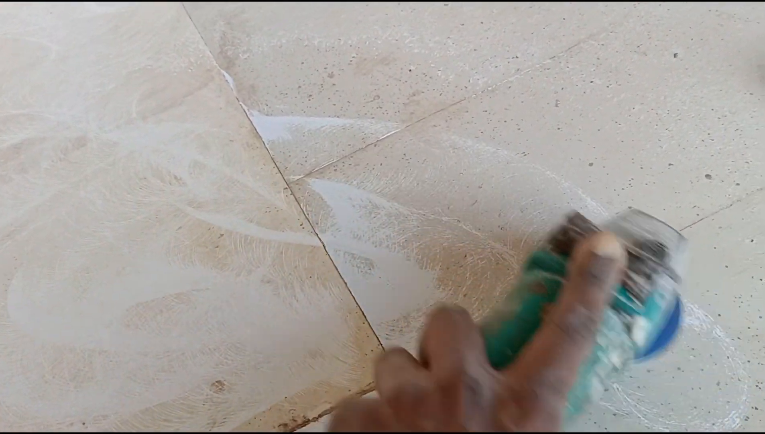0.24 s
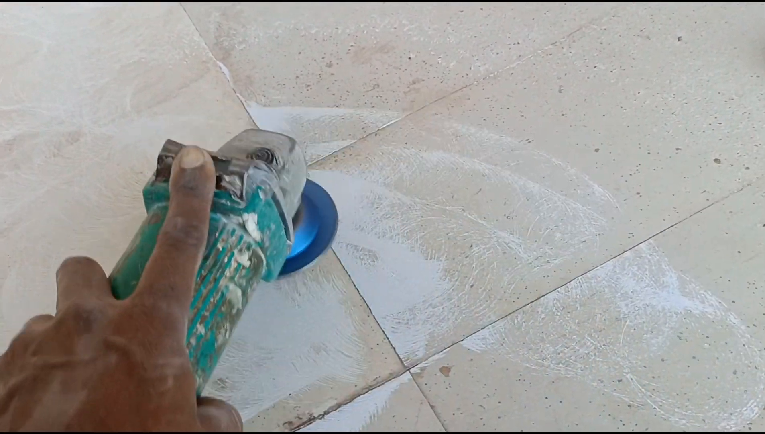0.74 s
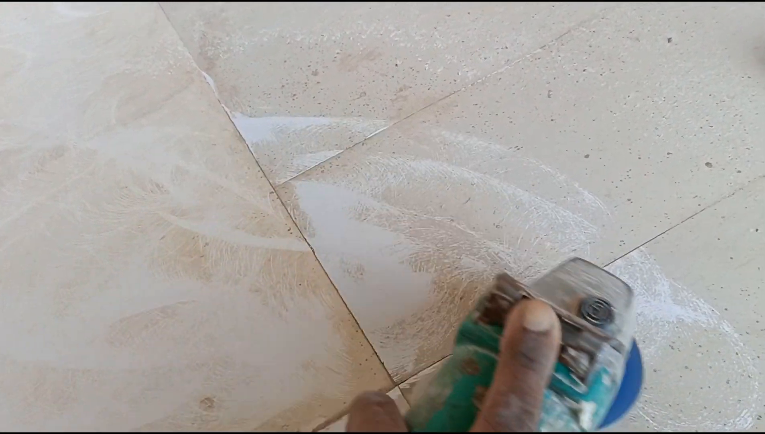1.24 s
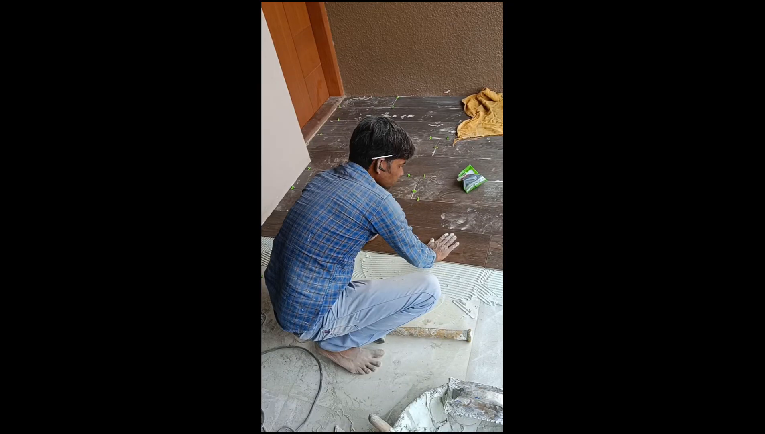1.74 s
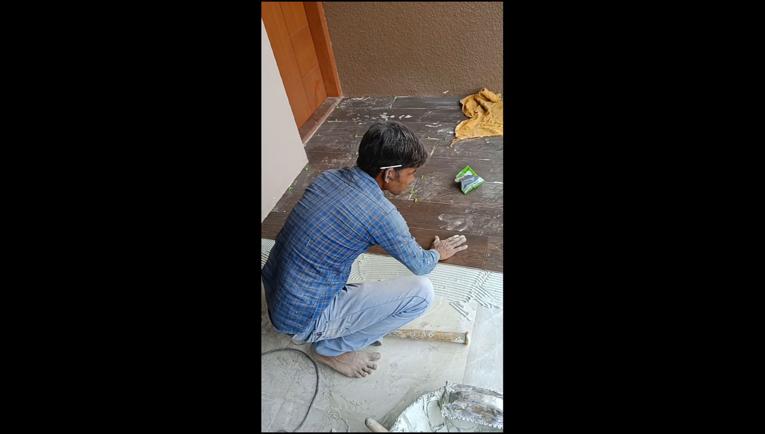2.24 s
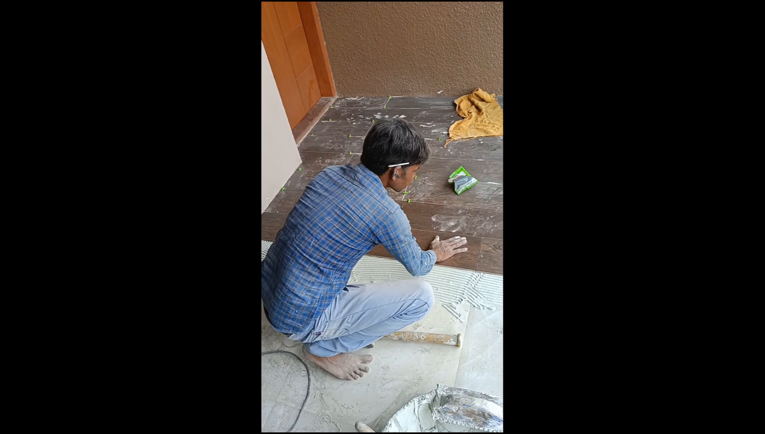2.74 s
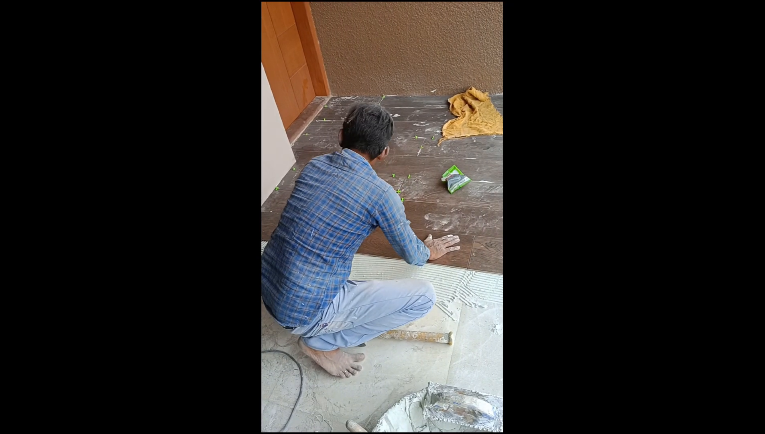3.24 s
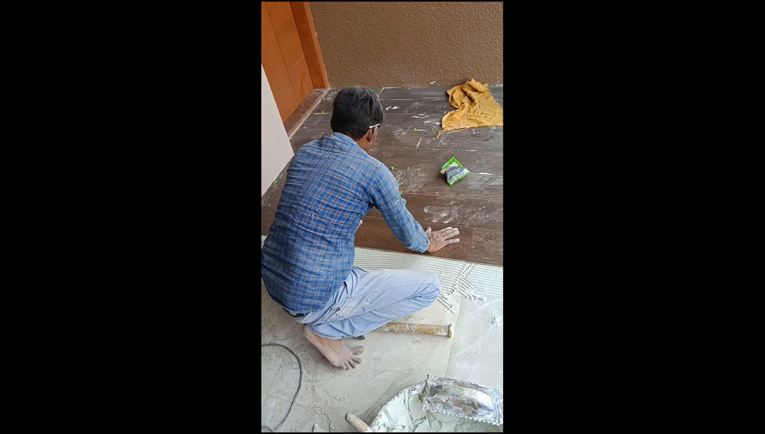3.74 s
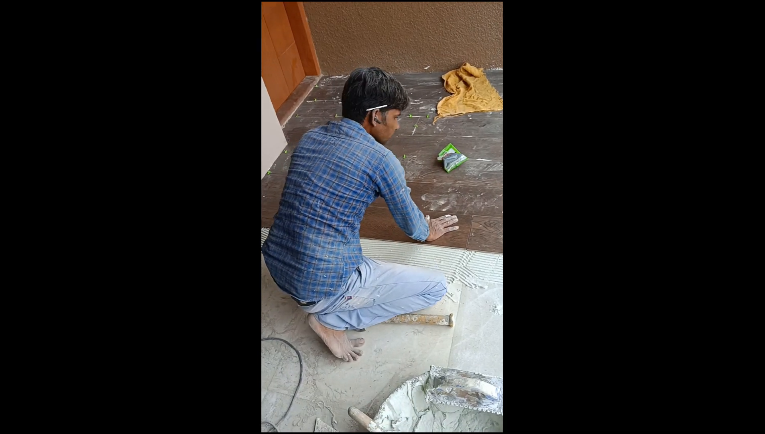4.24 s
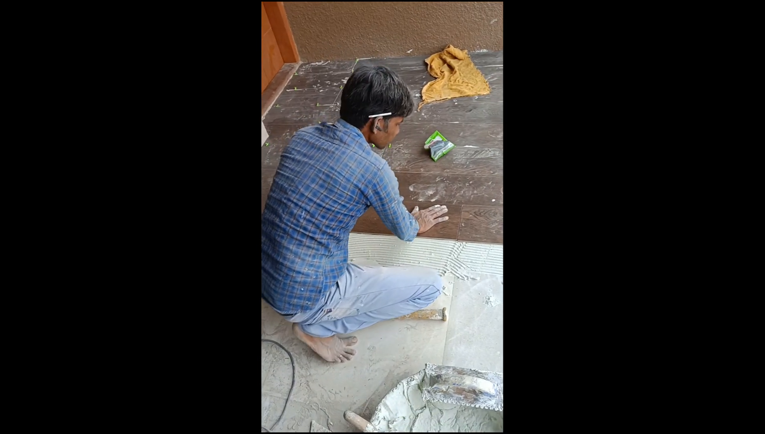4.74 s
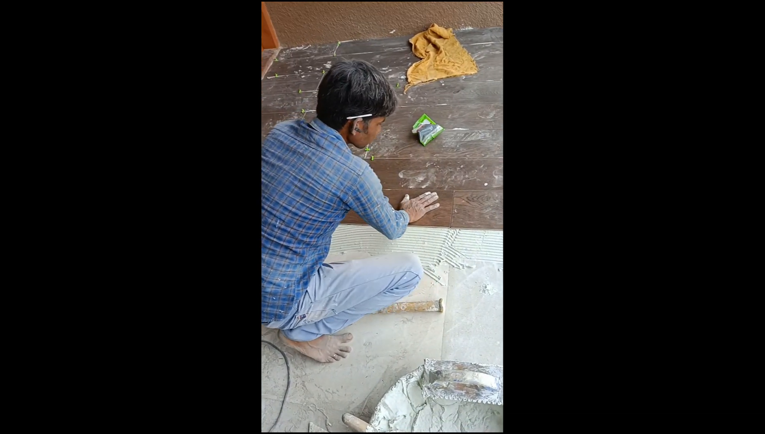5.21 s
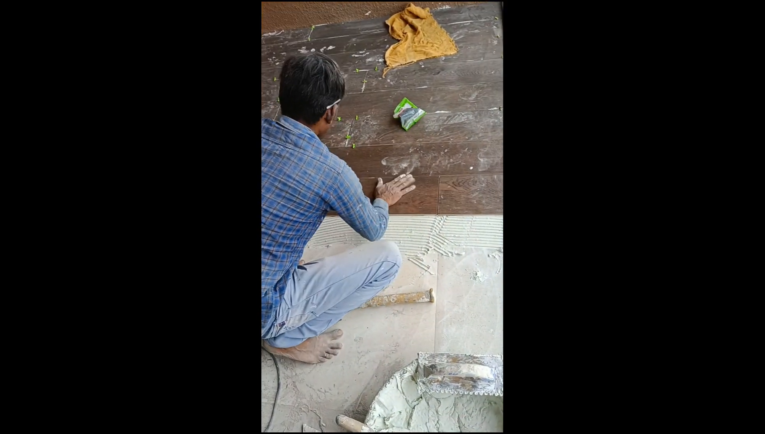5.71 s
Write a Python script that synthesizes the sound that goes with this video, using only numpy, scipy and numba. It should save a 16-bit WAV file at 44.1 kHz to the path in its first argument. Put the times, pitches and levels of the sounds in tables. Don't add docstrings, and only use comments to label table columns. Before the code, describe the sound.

From 0 to 1.4 s an angle grinder scours glazed tile right beside a phone: a dense, harsh, gritty rasp with metallic treble ringing, and low fan wind buffeting the microphone, heavier on the right. A thin gear whine near 5.8 kHz swells around 0.6-0.9 s as the tool swings close. It stops abruptly, leaving about 0.13 s of near silence. A quiet, bare, echoing room then fades in with street air, hand rumble and a dusty palm wipe until 2 s. Hollow tile thumps boom at 2.2 and, harder, 2.6 s, with sharp ticks around 2.8 s. A small steel tool clinks at 3.1 s. Distant hammer taps recur about every 0.45 s from 3.2 to 5.5 s, among faint chirps, grit snaps and soft wipes, the longest at 4.6-4.95 s. A final heavy thump lands at 5.8 s, then a loud knock at 5.95 s.

```python
import sys
import numpy as np
from scipy import signal
from scipy.fft import rfft, irfft, next_fast_len
from scipy.io import wavfile
from scipy.ndimage import uniform_filter1d
from numba import njit

SR = 44100
rng = np.random.default_rng(int(sys.argv[2]) if len(sys.argv) > 2 else 0)


def generate_wav(sig):
    pcm = np.round(np.clip(np.atleast_2d(sig).T, -1, 1) * 32767).astype(np.int16)
    wavfile.write(sys.argv[1], SR, pcm)


def how_loud(loudness_db):
    steps = np.asarray(loudness_db, float) / 20
    return 10 ** steps


N = 263277


def hertz(x):
    return np.maximum(np.fft.rfftfreq(x.shape[-1], 1 / SR), 1)


def read(table, hz):
    table_hz, value = np.transpose(table)
    return np.interp(np.log(hz), np.log(table_hz), value)


def colour(x, table):
    y = irfft(rfft(x) * how_loud(read(table, hertz(x))), x.shape[-1])
    return y / np.sqrt(np.mean(y ** 2, axis=-1, keepdims=True))


def walk(rate, n):
    hold = int(SR / rate) + 1
    steps = np.repeat(rng.standard_normal(n // hold + 1), hold)
    return 0.76 * uniform_filter1d(uniform_filter1d(steps, hold), hold)[:n]


def pair(n, like_hz):
    mid, side = rfft(rng.standard_normal((2, n)))
    like = 1 / (1 + (hertz(np.empty(n)) / like_hz) ** 3)
    opposite = np.array([[1], [-1]])
    return irfft(np.sqrt(1 + like) * mid + np.sqrt(1 - like) * side * opposite, n) / np.sqrt(2)


def octaves(x, gain):
    spectrum, place = rfft(x), 2 * np.log2(hertz(x) / 22)
    total = 0
    for k in range(20):
        band = irfft(spectrum * np.clip(1 - abs(place - k), 0, 1), x.shape[-1])
        total = total + gain(22 * 2 ** (k / 2)) * band
    return total


def grains(n, per_s, spread_db):
    when, sign, size = rng.random((3, 2, n))
    return (when < per_s / SR) * np.sign(sign - .5) * how_loud(-spread_db * np.log(size + 1e-4))


def ring(modes, length_s):
    t = np.arange(int(length_s * SR)) / SR
    total = 0
    for (hz, db, t60), (off_pitch, off_level) in zip(modes, rng.standard_normal((len(modes), 2))):
        tone = np.sin(2 * np.pi * hz * (1 + 0.0048 * off_pitch) * t)
        total = total + how_loud(db + 2.4 * off_level) * tone * 1000 ** (-t / t60)
    return total


def add(out, start_s, x):
    i = int(start_s * SR)
    out[..., i:i + x.shape[-1]] += x[..., :N - i]


def sides(db, pan_db):
    return how_loud(db + np.array([pan_db, -pan_db]) / 2)


# pitch_hz [Hz], t60_s [s]
ROOM_T60 = [(100, 0.91), (300, 0.7), (1000, 0.37), (3000, 0.41), (8000, 0.3), (15000, 0.22)]


def echo(length_s):
    t = np.arange(next_fast_len(int(length_s * SR))) / SR
    tail = octaves(pair(len(t), 440), lambda hz: 1000 ** (-t / read(ROOM_T60, hz)))
    tail = tail * np.clip(t / 0.0051, 0, 1)
    return tail / np.sqrt(np.mean(np.sum(tail ** 2, axis=1)))


# pitch_hz [Hz], level_db [dB per Hz]
STREET_COLOUR = [(60, -31.5), (120, 0.5), (200, -1.5), (400, -7.5), (630, -10.5), (1000, -12), (2300, -18),
                 (2800, -27.5), (3300, -29), (4000, -27.5), (6300, -30.5), (7300, -38), (8000, -49),
                 (15000, -47)]
# middle_s [s], length_s [s], level_db [dB], upper_db [dB], left_minus_right_db [dB]
GRIPS = [
    (1.655, 0.045, -43, -46, -18.5),
    (1.795, .07, -43.5, -45.5, -7.5),
    (3.84, 0.35, -53, -69, 3),
    (4.225, 0.034, -55, -60, 6),
    (5.11, 0.089, -65, -61, .5),
]


def hush():
    air = how_loud(-52.5) * octaves(colour(pair(N, 480), STREET_COLOUR), lambda hz: how_loud(0.6 * walk(7.2, N)))
    t = np.arange(N) / SR
    tremor_db, tremors_per_s = 2, 6.8
    low = how_loud(-53.5 + tremor_db * walk(tremors_per_s, N))
    high = how_loud(-62.5 + tremor_db * walk(tremors_per_s, N))
    for middle_s, length_s, db, upper_db, pan_db in GRIPS:
        bump = np.exp(-((t - middle_s) / length_s) ** 2)
        low = low + sides(db, pan_db)[:, None] * bump
        high = high + sides(upper_db, pan_db)[:, None] * bump
    rumble = colour(pair(N, 60), [(15, -5.0), (27, 28.0), (50, 7.5), (70, -39.0)])
    upper = colour(pair(N, 100), [(45, -38), (62, 20.5), (98, 3.0), (125, -42.5)])
    return air + low * rumble + high * upper


# start_s [s], end_s [s], pitch_hz [Hz], level_db [dB]
NOTES = [(2.42, 2.512, 4600, -65), (2.98, 3.807, 3800, -73), (3.98, 4.14, 4340, -74),
         (3.553, 3.717, 3770, -63), (4.14, 4.206, 3700, -60), (4.27, 4.37, 3690, -63),
         (4.32, 4.386, 1470, -60), (5.152, 5.332, 3720, -72), (5.63, 5.686, 1450, -59),
         (5.67, 5.81, 3800, -74), (5.694, 5.812, 674, -42.5), (4.748, 5.3, 88, -63), (5.448, 5.8, 88, -56),
         (5.775, 5.827, 3700, -55)]


def notes():
    out = np.zeros((2, N))
    for start_s, end_s, hz, db in NOTES:
        t = np.arange(0, end_s - start_s, 1 / SR)
        ends = np.clip(np.minimum(t / 0.02, (t[-1] - t) / 0.022), 0, 1)
        level = how_loud(db - 1.5 + 0.55 * walk(41, len(t)))
        add(out, start_s, level * ends * np.sin(2 * np.pi * hz * t + 0.52 * walk(43, len(t))))
    return out


# start_s [s], level_db [dB]
HAMMER = [
    (2.018, -37),
    (3.201, -35),
    (3.637, -34.5),
    (4.081, -39),
    (4.54, -36.5),
    (4.986, -35.5),
    (5.457, -41.5),
]
# start_s [s], level_db [dB], pitch_hz [Hz], spread [share of pitch],
# room_db [dB]
TAPS = [
    (1.675, -44, 1000, 0.48, 4),
    (2.74, -20.5, 450, 0.62, 13),
    (2.815, -15, 1083, 0.3, 10.5),
    (2.832, -20, 1150, 0.53, -12),
    (3.488, -47.5, 1180, 0.52, 11),
    (3.595, -36.5, 2300, 0.25, 7.5),
    (3.617, -43.5, 2160, 0.23, 10.5),
    (5.952, -12, 706, 0.43, 5),
        (2.824, -33, 2780, 0.78, 11.5),
    (3.105, -41, 1970, 0.66, 14),
    (3.128, -37.5, 2100, 0.14, 6.3),
    (3.491, -49, 4470, 0.88, 4),
]


def taps():
    out, t = np.zeros((2, N)), np.arange(int(.02 * SR)) / SR
    hammer = [(start_s, db, 833, 0.34, 1) for start_s, db in HAMMER]
    for start_s, db, hz, spread, room_db in TAPS + hammer:
        ratio = 1.1 + abs(spread)
        band = signal.butter(3, [hz / ratio, min(hz * ratio, 7000)], "bandpass", fs=SR, output="sos")
        rough = 1 + 0.34 * rng.standard_normal(len(t))
        tick = signal.sosfilt(band, rough * np.exp(-t / .00006))
        tick *= how_loud(db - 1.0) / np.abs(tick).max()
        add(out, start_s, tick)
        add(out, start_s, how_loud(room_db) * signal.fftconvolve(tick[None], echo(0.31), axes=1))
    return out


# pitch_hz [Hz], level_db [dB], t60_s [s]
STEEL_MODES = [(2140, 7, .12), (2900, -5, .2), (4000, 2.5, 0.16), (3925, 6, .2)]


def clink():
    out, start_s = np.zeros((2, N)), 3.106
    bar = how_loud(-54) * ring(STEEL_MODES, .3)
    add(out, start_s, .4 * bar)
    add(out, start_s, signal.fftconvolve(bar[None], echo(.4), axes=1))
    return out


# start_s [s], level_db [dB]
CRACKS = [
    (3.49, -58),
    (3.96, -60.5),
    (4.089, -61),
    (4.225, -70),
]


def cracks():
    out, t = np.zeros((2, N)), np.arange(int(.06 * SR)) / SR
    for start_s, db in CRACKS:
        noise = rng.standard_normal((2, len(t)))
        snap = colour(noise, [(4000, -28), (7000, -6), (10000, 3.5), (15500, -3.5)])
        add(out, start_s, how_loud(db) * snap * 1000 ** (-t / .07))
    return out


# pitch_hz [Hz], level_db [dB per Hz]
WIPE = [(1650, -3), (2800, -11.5), (3850, -4), (5130, -7), (6010, -2), (8380, -16.5), (12200, -21.5),
        (14700, -25), (15700, -18)]
# pitch_hz [Hz], level_db [dB per Hz]
WIPE_DULL = [(500, -12), (1200, -11), (2200, -6.5), (3000, -14), (4500, -41)]


def rub(n, bright, dull):
    dust = rng.standard_normal((2, n)) + 0.83 * grains(n, 1500, 1.2)
    dust = dust * how_loud(0.84 * walk(38.0, n))
    return bright * colour(dust, [(1800, -49)] + WIPE) + dull * colour(dust, WIPE_DULL)


# start_s [s], fastest_s [s], end_s [s], level_db [dB], dull_db [dB]
STROKES = [
    (1.299, 1.763, 1.98, -43.5, -2),
    (2.075, 2.128, 2.19, -67, -10),
    (3.49, 3.486, 3.57, -51, -11),
    (3.787, 3.832, 3.88, -62.5, -1),
    (3.88, 3.924, 4.02, -61, 0),
    (4.14, 4.162, 4.25, -73, -3),
    (4.6, 4.799, 4.95, -45, -4.5),
    (4.81, 4.86, 4.96, -56, 12.5),
    (5.107, 5.138, 5.23, -60, -8),
    (5.527, 5.575, 5.62, -66.5, -5),
]


def wipes():
    out = np.zeros((2, N))
    for start_s, fastest_s, end_s, db, dull_db in STROKES:
        t = np.arange(start_s, end_s, 1 / SR)

        def arch(top_s):
            return np.sin(np.interp(t, [start_s, top_s, end_s], [0, np.pi / 2, np.pi])).clip(0)

        speed = arch(fastest_s)
        press = arch(fastest_s + 0.33 * (end_s - fastest_s))
        add(out, start_s, how_loud(db + 0.5) * rub(len(t), speed ** 1.72, how_loud(dull_db) * press ** 3.6))
    before = np.arange(-.03, 0, 1 / SR)
    for thump, db in zip(THUMPS, [-44.5, -48.5, -38]):
        swell = how_loud(db + 2501 * before)
        add(out, thump[0] + before[0], swell * rub(len(before), 1, how_loud(14)))
    return out


# pitch_hz [Hz], level_db [dB per Hz]
SNAP = [(800, -14), (2200, 3), (4000, -14.5), (6000, -6.5), (8000, -25), (15500, -30)]


def snaps():
    out, t = np.zeros((2, N)), np.arange(-.002, .002, 1 / SR)
    for start_s, db, *_ in THUMPS:
        click = colour(rng.standard_normal(len(t)), SNAP) * np.exp(-(t / 0.00061) ** 2)
        add(out, start_s + .002 + t[0], how_loud(db - 10) * click)
    return out


# start_s [s], level_db [dB], boom_db [dB], brightness [dB per octave], slab_hz [Hz]
THUMPS = [
    (2.216, -7, -13, 0, 2360),
    (2.595, -2.5, -14, -2.5, 1936),
    (5.813, -3, -12.5, 0, 2260),
]
# pitch_hz [Hz], level_db [dB], t60_s [s]
TILE = [(545, -2.5, 0.069), (642, -14.5, 0.0052), (950, 2, 0.027), (2076, -9, 0.016), (2170, -5, 0.012),
        (3920, -10.5, 0.0064)]
# pitch_hz [Hz], level_db [dB per Hz]
SLAB = [(60, -45.5), (150, -10.5), (250, -14), (380, -14), (660, -17.5), (1250, -17), (2300, -26),
        (2900, -33), (5800, -30.5), (7300, -35.5), (8000, -46), (15700, -54)]
# pitch_hz [Hz], level_db [dB], t60_s [s]
BED = [(51.4, -11.5, 0.76), (88, -14, 0.73), (147, -7, 0.56),
       (130.7, 2, 1.23), (179.5, -9.5, 0.99), (204, 2.5, 0.63), (221.4, 0.5, 0.97), (259, 13, 0.3),
        (330, -10, 0.4), (410, -10, 0.32), (447, -0.5, 0.61), (460, -19, 0.72)]


def thumps():
    out = np.zeros((2, N))
    no_bass = signal.butter(2, 250, "highpass", fs=SR, output="sos")
    next_starts = [row[0] for row in THUMPS[1:]] + [N / SR]
    for (start_s, db, boom_db, bright_db, slab_hz), next_s in zip(THUMPS, next_starts):
        push = np.hanning(int(0.00024 * SR))
        for late_s, part_db in (0, -14), (.0028, 2), (.0062, -0.5):
            knock = np.convolve(ring(TILE, 0.048), push / push.sum())
            blow = how_loud(db + part_db + 2.0) * signal.sosfilt(no_bass, knock)
            add(out, start_s + late_s, np.array([.85 * np.roll(blow, 14), 1.15 * blow]))

        tail = echo(0.97)
        t = np.arange(tail.shape[1]) / SR
        tail = tail * (1 + 1.1 * np.exp(-t / 0.0037))
        hz = hertz(tail)
        tilt_db = bright_db * np.log2(hz / 2000).clip(0)
        lift_db = 7 / (1 + (2 * (hz - slab_hz) / 890) ** 2)
        tail = irfft(rfft(tail) * how_loud(read(SLAB, hz) + tilt_db + lift_db), len(t))
        add(out, start_s, how_loud(db + 52.5) * tail * np.linspace(3, 0, len(t)).clip(0, 1))

        boom = ring(BED, next_s - start_s + 0.012)
        t = np.arange(len(boom)) / SR
        boom = boom * np.exp(-(t / .5) ** 4)
        swell = 1 - np.exp(-t / 0.059)
        stop = np.clip(np.arange(len(boom), 0, -1) / (.01 * SR), 0, 1)
        add(out, start_s, how_loud(db + boom_db + 3.55) * boom * swell * stop)
    return out


# time_s [s], gear_hz [Hz], facing [0-1]
SWING = [
    (0, 5800, 0),
    (.3, 5810, 0.43),
    (.45, 5780, 0),
    (0.601, 5838, 0.8),
    (.77, 5830, 0.88),
    (.91, 5785, 0.92),
    (.96, 5700, .4),
    (1.1, 5690, 0.35),
    (1.2, 5800, 0.23),
]
# pitch_hz [Hz], level_db [dB per Hz]
WIND = [(12, -39), (20, 2), (53, 3.5), (108, 0.5), (214, -3), (456, -8), (847, -8.5), (3070, -23.5),
        (4000, -22), (5200, -44), (8800, -120)]
# pitch_hz [Hz], level_db [dB per Hz]
GRIT = [(410, -33), (700, -18), (851, -4), (1570, -9), (2320, -6.5), (3080, -12.5), (5910, -10),
        (7470, -13.5), (9080, -27), (10100, -21), (12600, -28.5), (13900, -22.5), (15700, -22.5)]
# pitch_hz [Hz], width_hz [Hz], level_db [dB]
DISC = [(7450, 300, 2.5), (9800, 500, 4), (11400, 200, 7), (13350, 330, 9), (14350, 400, 7),
        (15150, 350, 7)]
# pitch_hz [Hz], left_minus_right_db [dB]
GRIT_PAN = [(1000, -3.5), (4000, -2), (8000, -2.5), (14000, -12)]


def grinder():
    n = next_fast_len(int(1.5 * SR))
    t = np.arange(n) / SR
    time_s, gear_hz, facing = np.transpose(SWING)
    gear_hz, facing = np.interp(t, time_s, gear_hz), np.interp(t, time_s, facing)

    scratch = rng.standard_normal((2, n)) + 0.85 * grains(n, 4000, 2.8)
    lift = 1
    for hz, width_hz, db in DISC:
        lift = lift + (how_loud(db) - 1) / (1 + (2 * (hertz(t) - hz) / width_hz) ** 2)
    grit = colour(irfft(rfft(scratch) * lift, n), GRIT)
    grit = octaves(grit, lambda hz: how_loud(0.48 * walk(5.4, n)) * sides(0, read(GRIT_PAN, hz))[:, None])

    gusts_per_s = 9.06
    wind_db = -23 + 0.75 * t + 1.84 * walk(gusts_per_s, n)
    bass_db = -2.5 + 2.5 * walk(gusts_per_s, n)
    wind_pan_db = -17 + 3 * facing
    bursts = how_loud(4.76 * np.array([walk(150, n), walk(150, n)]))
    eddies = rng.standard_normal((2, n)) * bursts + 0.67 * grains(n, 1200, 5.4)

    def gust(hz):
        db = wind_db + (hz < 140) * bass_db + .5 * walk(20.9, n)
        return sides(db, wind_pan_db * (.7 if hz < 140 else 1.1))

    wind = octaves(colour(eddies, WIND + [(12000, -130)]), gust)
    port_top = .7
    wind = port_top * np.tanh(wind / port_top)

    turn = 2 * np.pi * np.cumsum(gear_hz + 4 * walk(60, n)) / SR
    gear = how_loud(-54 + 23 * facing + 1.5 * walk(25, n)) * np.sin(turn + np.array([[0], [1.2]]))
    out = np.zeros((2, N))
    out[:, :n] = how_loud(-26.5 + 1.9 * facing) * grit + wind + gear
    return out


CUT_S, BACK_S, FADE_S = 1.4335, 1.566, 0.15


def scene():
    t = np.arange(N) / SR
    indoors = thumps() + snaps() + taps() + cracks() + clink() + wipes() + notes() + hush()
    smear = 0.035 * np.clip(1 - (t - CUT_S) / 0.0027, 0, 1)
    outgoing = np.where(t < CUT_S, 1, smear)
    return grinder() * outgoing + indoors * np.clip((t - BACK_S) / FADE_S, 0, 1)


@njit
def follow(x, attack, release):
    level, out = 0., np.empty(len(x))
    for i in range(len(x)):
        level += (x[i] - level) * (attack if x[i] > level else release)
        out[i] = level
    return out


def roll_off(x):
    return signal.sosfilt(signal.butter(12, 15540, fs=SR, output="sos"), x)


def record(dry):
    level = follow(np.abs(dry).max(axis=0), 1 / (0.0028 * SR), 1 / (.12 * SR))
    gain = np.minimum(1, (how_loud(-18.0) / (level + 1e-9)) ** 0.56)
    gain[:int(BACK_S * SR)] = 1
    rounded = 0.93 * np.tanh(dry * gain / 0.8)
    treble_limit = signal.ellip(8, .2, 60, 15540, fs=SR, output="sos")
    return roll_off(signal.sosfilt(treble_limit, rounded))


dry = scene()
out = record(dry)
generate_wav(out)
```